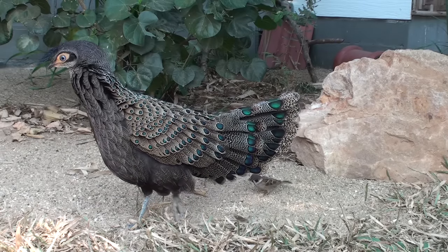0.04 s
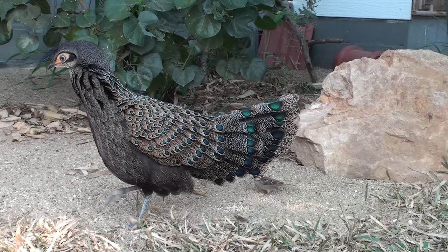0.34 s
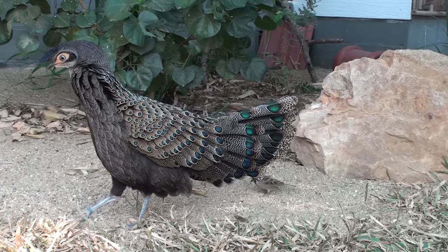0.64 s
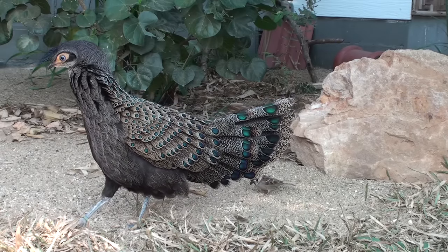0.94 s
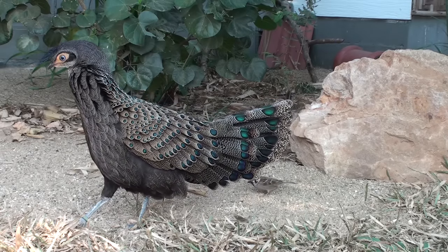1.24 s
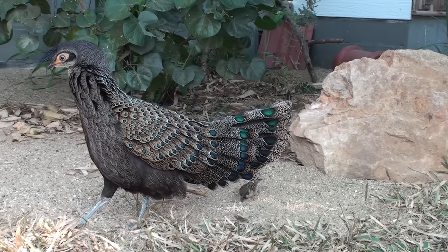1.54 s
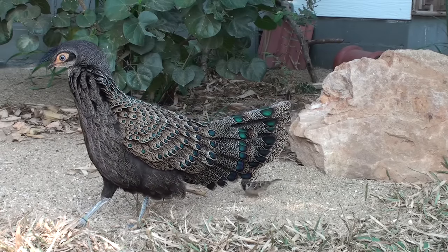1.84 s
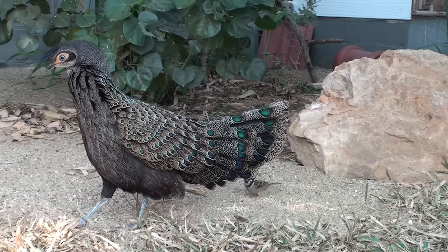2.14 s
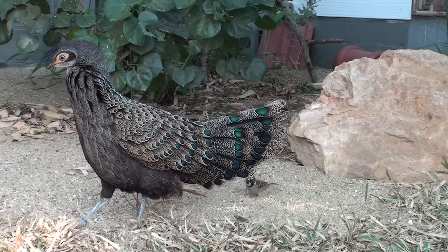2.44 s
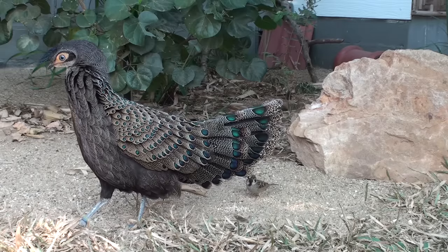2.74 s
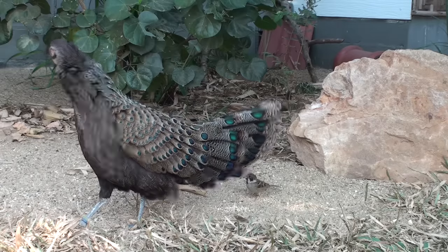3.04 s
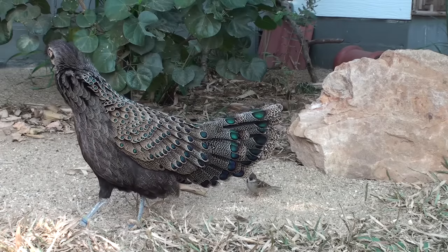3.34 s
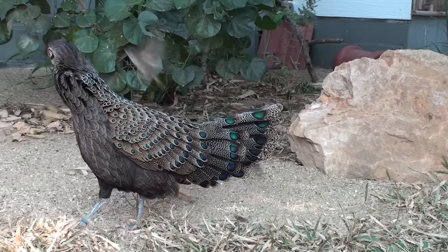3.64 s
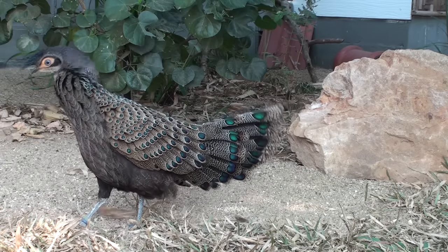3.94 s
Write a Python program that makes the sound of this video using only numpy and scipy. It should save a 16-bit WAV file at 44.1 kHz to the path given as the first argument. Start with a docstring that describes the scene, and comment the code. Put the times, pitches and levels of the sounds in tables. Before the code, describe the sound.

Four rising pheasant whistles and a sharp chip sound over faint fowl and outdoor rumble.

```python
"""Grit scuffs underfoot, then a pheasant in a sandy yard gives four rising whistles and one sharp chip:
gliding tones, thrown back to the microphone by a wall and a rock. Small birds call on the left,
roosters crow and fowl yelp in the distance, and at the end a small bird flutters off, its wings
puffing and clapping. Under it all lie a low rumble, distant traffic and a fine hiss."""
import sys
import numpy as np
from scipy import signal
from scipy.fft import rfft, irfft
from scipy.io import wavfile

SR = 44100
rng = np.random.default_rng(int(sys.argv[2]) if len(sys.argv) > 2 else 0)


def to_wav(sig):
    """Store sig (one row per channel, or 1-D mono) as 16-bit WAV at the path in sys.argv[1].

    Samples outside -1..1 are clipped; the rate is SR.
    """
    pcm = np.clip(np.atleast_2d(sig), -1, 1) * 32767
    pcm = np.round(pcm).astype(np.int16)
    wavfile.write(sys.argv[1], SR, pcm.T)  # frames by channels


N = 176400

# the pheasant's whistles: start_s, length_s, level_db, pitch_ratio, rasp_level_db
WHISTLES = [(0.352, 0.17, -36.5, 0.99, -55.5), (1.608, 0.178, -39, 1.0, -60.5),
            (2.403, 0.2, -40, 0.97, -56), (3.642, 0.2, -40, 0.98, -56)]
# the rise they share: share_of_length, base_pitch_hz, relative_db
WHISTLE_GLIDE = [(0, 3560, -22), (.13, 3930, -10), (.23, 4170, -9), (.33, 4480, -1.5), (.47, 4800, 0),
                 (.6, 5170, -1), (.71, 5290, -2), (.78, 5650, 1.5), (.84, 6250, .5), (.895, 6850, -3),
                 (.935, 7020, -6), (1, 6600, -11)]
# the sharp chip: time_s, pitch_hz, level_db
CHIP = [(.942, 3450, -56), (.949, 5330, -41), (.956, 6010, -46), (.965, 5800, -32.5), (.975, 5770, -31.5),
        (.981, 5710, -41.5), (.986, 6050, -35.5), (.993, 6900, -48), (1.003, 6600, -36)]
# near reflections at the microphone: left_delay_s, right_delay_s, left_gain, right_gain
ECHOES = [(.0052, .0052, 0.25, 0.22), (0.0118, 0.0086, 0.3, 0.062), (.022, .022, .38, 0.38),
          (.029, .028, 0.42, .18)]


def pheasant():
    """Close by, a little right: rasp-led whistles and a chip, with near echoes and two tails."""
    dry = np.zeros(N)
    for start, length, db, ratio, rasp_db in WHISTLES:
        curve = [(start + u * length, hz * ratio, db + rel_db) for u, hz, rel_db in WHISTLE_GLIDE]
        add(dry, *voice(curve, [0, -38], jitter=0.007, jitter_hz=216, shimmer_db=2.4, waver=0.008))
        add(dry, *rasp(start - 0.029, length=0.058, hz=5330, width_hz=1600, db=rasp_db, skew=0.6))
    add(dry, *voice(CHIP, [0, -36], jitter=0.0067, jitter_hz=150, shimmer_db=2.5))
    near = pan(dry, left_db=-3.5)
    for left_s, right_s, left_gain, right_gain in ECHOES:
        add(near[0], left_s, left_gain * dry)
        add(near[1], right_s, right_gain * dry)
    short_tail = yard(dry, t60_s=0.26, rise_s=0.012, left_db=2, coherence=0.9)
    long_tail = yard(dry, t60_s=1.0, rise_s=0.04, left_db=0, coherence=0.5)
    return near + amp(-7.5) * short_tail + amp(-23) * long_tail


# a small bird's falling slur: time_s, pitch_hz, level_db
SLUR = [(.574, 3900, -62), (.585, 3550, -57), (.594, 3950, -39.5), (.604, 4350, -55), (.615, 3950, -63),
        (.622, 2900, -48.5), (.63, 2120, -51.5), (.648, 2500, -55)]
# a short hoarse cluck: time_s, pitch_hz, level_db
CLUCK = [(2.25, 1540, -64), (2.257, 1590, -55), (2.264, 1902, -56), (2.272, 1590, -54.5),
         (2.285, 1580, -53)]
# hoarse notes: start_s, length_s, centre_hz, width_hz, level_db
HOARSE_NOTES = [(-.02, 0.069, 3600, 970, -61), (0.165, 0.029, 3580, 400, -61.5),
                (2.262, 0.064, 4720, 1800, -63), (3.044, 0.11, 4370, 1130, -60)]


def small_birds():
    """From the bushes left of the microphone: a slur, a cluck and hoarse notes."""
    dry = np.zeros(N)
    add(dry, *voice(SLUR, [0, -26], jitter=0.01, jitter_hz=200, shimmer_db=1))
    add(dry, *voice(CLUCK, [3, -1, -10, -14], jitter=0.037, jitter_hz=596, shimmer_db=3.5, edge_s=0.0027))
    for note in HOARSE_NOTES:
        add(dry, *rasp(*note))
    return pan(dry, left_db=4) + amp(-6) * yard(dry, t60_s=0.2, rise_s=0.006, left_db=4)


# a small bird's wingbeats: start_s, level_db
WINGBEATS = [(3.575, -50.5), (3.664, -50), (3.702, -49.5), (3.743, -52.5), (3.792, -50.5), (3.824, -50),
             (3.857, -49.5), (3.899, -50.5), (3.94, -51)]
# spectrum of a puff of air: frequency_hz, relative_db
PUFF_SPECTRUM = [(40, -9), (130, 5), (300, -2.5), (600, -5.5), (1200, -14.5), (3000, -16.5), (8000, -29),
                 (16000, -45)]
# claps of the first downstrokes: start_s, level_db
WING_CLAPS = [(3.663, -41), (3.703, -48)]
# spectrum of a clap's snap: frequency_hz, relative_db
SNAP_SPECTRUM = [(200, -23), (900, -17), (3000, 8), (4500, -15), (12000, -23)]


def wings(puff_rise_s=0.0029, clap_hz=585, clap_rise_s=0.0013, clap_decay_s=0.0033):
    """Take-off just left of centre: each beat puffs air, and the first hard strokes also clap."""
    t = np.arange(4000) / SR
    puffs, snaps = np.zeros((2, N))
    for start, db in WINGBEATS:
        add(puffs, start, amp(db) * t / puff_rise_s * np.exp(1 - t / puff_rise_s))
    dry = colour(puffs * rng.standard_normal(N), PUFF_SPECTRUM)
    for start, db in WING_CLAPS:
        envelope = amp(db) * np.minimum(t / clap_rise_s, 1) * np.exp(-t / clap_decay_s)
        add(dry, start, envelope * np.sin(2 * np.pi * clap_hz * t))
        add(snaps, start, envelope * rng.standard_normal(len(t)))
    dry += amp(-9.5) * colour(snaps, SNAP_SPECTRUM)
    return pan(dry, left_db=2.5) + amp(-2) * yard(dry, t60_s=0.4, rise_s=0.01, left_db=2.5)


# scuffs on sand: start_s, length_s, level_db
SCUFFS = [(0.003, 0.42, -64.5), (1.598, 0.15, -68), (2.488, 0.26, -66.5), (3.61, 0.11, -63),
          (3.697, 0.38, -63)]
# spectrum of shifting sand: frequency_hz, relative_db
SAND_SPECTRUM = [(1000, 2), (4000, 1), (9000, 1), (13000, 0.5), (18000, -14.5)]
# ticks of larger grains: start_s, level_db
TICKS = [(.082, -52), (.09, -52.5), (.162, -55), (0.222, -53), (.266, -54), (1.672, -55), (2.63, -59),
         (3.479, -60), (3.792, -57), (3.931, -53)]
# spectrum of a tick: frequency_hz, relative_db
TICK_SPECTRUM = [(1000, -8), (9000, 6), (13500, -1), (18000, -13)]


def grit(grains_per_s=2500, tick_decay_s=0.0035):
    """Straight ahead of the microphone, feet shift sand grains; a few larger ones tick."""
    scuffing, ticks = np.zeros((2, N))
    for start, length, db in SCUFFS:
        progress = np.arange(0, length, 1 / SR) / length
        add(scuffing, start, amp(db) * np.sqrt(abs(np.sin(np.pi * progress))))
    grains = rng.standard_normal(N) * (rng.random(N) < grains_per_s / SR)
    t = np.arange(2000) / SR
    for start, db in TICKS:
        add(ticks, start, amp(db) * np.exp(-t / tick_decay_s) * rng.standard_normal(len(t)))
    return colour(scuffing * unit(grains), SAND_SPECTRUM) + colour(ticks, TICK_SPECTRUM)


# a distant rooster: time_s, pitch_hz, level_db
HIGH_CROW = [(.72, 975, -72), (.79, 1003, -57.5), (.93, 986.4, -73), (1.02, 1030, -59), (1.2, 997, -56),
             (1.37, 1004, -58), (1.52, 1019, -76), (1.65, 1000, -59), (1.76, 1000, -66), (1.82, 983, -77)]
# a second, lower rooster: time_s, pitch_hz, level_db
LOW_CROW = [(.49, 784, -83), (.53, 801, -56), (.62, 820, -82), (.78, 971, -66.5), (1.1, 926, -66),
            (1.4, 898, -72), (1.6, 881, -78), (1.78, 863, -61.5), (1.88, 844, -71)]
# falling yelps: start_s, pitch_hz, level_db, fall_share, jitter_share, fourth_harmonic_db
YELPS = [(1.885, 760.5, -57.5, 0.059, 0.037, -14), (2.135, 794, -58.5, 0.082, 0.0277, -9),
         (2.385, 750.4, -60, 0.038, 0.016, -20), (2.65, 757.5, -63, 0.047, .012, -15),
         (2.97, 755, -62.5, 0.045, 0.011, -11)]


def far_fowl(yelp_s=0.12):
    """Far off to the left: two crows overlap, then fowl yelp, all blurred by reverberation."""
    dry = np.zeros(N)
    add(dry, *voice(HIGH_CROW, [-11, 4, -15, -9], jitter=0.014, jitter_hz=110,
                    shimmer_db=2, edge_s=0.047))
    add(dry, *voice(LOW_CROW, [-1, 1.5, -1.5, -16], jitter=0.0251, jitter_hz=110,
                    shimmer_db=2.5, edge_s=0.016))
    for start, hz, db, fall, jitter, fourth_db in YELPS:
        curve = [(start, hz * (1 + fall), db - 2),
                 (start + 0.291 * yelp_s, hz, db),
                 (start + yelp_s, hz * (1 - fall), db - 5)]
        add(dry, *voice(curve, [-6, -36, 3, fourth_db], jitter, jitter_hz=152.2,
                        shimmer_db=3, edge_s=0.013))
    return amp(-2.5) * (pan(dry, left_db=8.5) + yard(dry, t60_s=0.46, rise_s=0.011, left_db=3.5))


# spectrum of the yard's rumble and hiss: frequency_hz, relative_db
AIR_SPECTRUM = [(12, -55), (25, -14.5), (45, -3.5), (70, -1), (92, -1.5), (120, 0), (152, -5.5),
                (184, -14.5), (320, -19.5), (500, -17), (680, -12), (900, -19), (1110, -17), (1550, -20.5),
                (2150, -22), (2950, -28.5), (3400, -26.5), (4600, -27), (5900, -30.5), (7450, -17.5),
                (8600, -24.5), (9300, -25), (9950, -29.5), (10450, -28.5), (11500, -34.5), (18000, -42.5)]
# how alike the two channels are: frequency_hz, coherence
AIR_COHERENCE = [(60, 0.96), (110, 1), (200, 0.78), (380, 0.029), (700, 0.4), (1290, 0.05), (2400, 0.12),
                 (4400, 0.61), (8400, 0.6), (10000, 0.97)]
# balance at the microphone: frequency_hz, left_minus_right_db
AIR_BALANCE = [(60, 0), (150, 1), (380, 0.5), (950, 2.5), (2380, -1), (5980, -0.5), (15000, -0.5)]
# slow swell of the rumble: time_s, gain_db
RUMBLE_SWELL = [(0, 6.5), (.4, 2), (1.4, 1.3), (2, 0.5), (2.7, 3), (4, 4)]


def rumble_and_hiss(rumble_below_hz=230):
    """All around the microphone: steady hiss over a low rumble that eases and swells again."""
    hz = np.fft.rfftfreq(N, 1 / SR)
    left, independent = rfft(rng.standard_normal((2, N)))
    right = blend(left, independent, np.clip(read(AIR_COHERENCE, hz), -1, 1))
    left_db = read(AIR_BALANCE, hz)
    spectra = np.array([left * amp(left_db / 2), right * amp(-left_db / 2)])
    air = amp(-55.5) * unit(irfft(spectra * amp(read(AIR_SPECTRUM, hz)), N))
    rumble = irfft(rfft(air) / (1 + (hz / rumble_below_hz) ** 4), N)
    return air + rumble * (amp(follow(RUMBLE_SWELL)) - 1)


# spectrum of the distant road: frequency_hz, relative_db
TRAFFIC_SPECTRUM = [(200, -9), (450, -16.5), (650, -1.5), (850, -8.5), (1300, -13.5), (2500, -11.5),
                    (5000, -21.5), (10000, -71)]
# its rise and fall: time_s, level_db
TRAFFIC_SWELL = [(0, -62), (.4, -74), (.9, -56), (1.4, -61), (1.8, -58.5), (2.2, -76), (2.6, -71), (4, -65)]


def traffic():
    """A distant road, diffuse and leaning left: noise that swells and fades unevenly."""
    direct = pan(rng.standard_normal(N), left_db=9.5)
    diffuse = 1.96 * rng.standard_normal((2, N))
    road = unit(colour(direct + diffuse, TRAFFIC_SPECTRUM))
    return road * amp(follow(TRAFFIC_SWELL) + 4.5 * band(N, 0, 3.6))


def voice(curve, harmonics_db, jitter, jitter_hz, shimmer_db, edge_s=0.0024, waver=0.00712, waver_hz=40):
    """A bird's unsteady tone along rows of time_s, pitch_hz, level_db; returns start and sound."""
    times, hz, db = np.transpose(curve)
    t = np.arange(times[0], times[-1], 1 / SR)
    wobble = jitter * band(len(t), 0, jitter_hz) + waver * band(len(t), 0, waver_hz)
    pitch = np.interp(t, times, hz) * (1 + wobble)
    phase = 2 * np.pi * np.cumsum(pitch) / SR
    level = amp(np.interp(t, times, db) + shimmer_db * band(len(t), 0, jitter_hz))
    edges = np.clip(np.minimum(t - times[0], times[-1] - t) / edge_s, 0, 1)
    tone = sum(amp(gain_db) * np.sin(k * phase) for k, gain_db in enumerate(harmonics_db, 1))
    return times[0], edges * level * tone


def rasp(start, length, hz, width_hz, db, skew=0.74, grain_db=4.5):
    """A hoarse, grainy note with a quick swell and slower fade; returns start and sound."""
    progress = np.arange(0, length, 1 / SR) / length
    swell = np.sin(np.pi * progress ** skew) ** 2
    level = amp(db + grain_db * band(len(swell), 0, 120))
    return start, swell * level * band(len(swell), hz, width_hz)


def yard(x, t60_s, rise_s, left_db, coherence=1.0):
    """The yard's scattered reflections reach the microphone as a diffuse tail."""
    t = np.arange(SR) / SR
    envelope = (1 - np.exp(-t / rise_s)) * amp(-60 * t / t60_s)
    left, independent = rng.standard_normal((2, SR)) * envelope
    tails = np.array([left, blend(left, independent, coherence)]) / np.linalg.norm(left)
    return signal.fftconvolve(x[None], tails, axes=1)[:, :N] * amp([[left_db / 2], [-left_db / 2]])


def amp(db):
    """Decibels to gain."""
    return 10 ** (np.asarray(db) / 20)


def unit(x):
    """Scales to rms 1."""
    return x / np.sqrt(np.mean(x ** 2) + 1e-20)


def read(points, hz):
    """Reads a table on a log-frequency axis."""
    frequencies, values = np.transpose(points)
    return np.interp(np.log(hz + 1), np.log(frequencies + 1), values)


def follow(points):
    """Reads a table along the scene's time."""
    return np.interp(np.arange(N) / SR, *np.transpose(points))


def add(track, start_s, sound):
    """Adds a sound to a track, cut to fit."""
    at = round(start_s * SR)
    sound = sound[max(-at, 0):]
    part = track[max(at, 0):][:len(sound)]
    part += sound[:len(part)]


def colour(x, points):
    """Gives a signal a spectrum, keeping the power of white noise."""
    gain = unit(amp(read(points, np.fft.rfftfreq(N, 1 / SR))))
    return irfft(rfft(x) * gain, N)


def band(size, hz, width_hz):
    """Noise in a bell-shaped band; at 0 Hz, a random wobble."""
    bell = np.exp(-((np.fft.rfftfreq(N, 1 / SR) - hz) / width_hz) ** 2)
    return unit(irfft(rfft(rng.standard_normal(N)) * bell, N))[:size]


def blend(noise, independent, coherence):
    """Mixes two noises at constant power; coherence 1 gives only the first."""
    return coherence * noise + np.sqrt(1 - coherence ** 2) * independent


def pan(x, left_db):
    """Places a sound between the channels."""
    return np.array([x * amp(left_db / 2), x * amp(-left_db / 2)])


def scene():
    """The whole yard from one stereo microphone."""
    return pheasant() + small_birds() + wings() + grit() + far_fowl() + rumble_and_hiss() + traffic()


def record(dry):
    """The recorder's band limit."""
    lowpass = signal.firwin(511, cutoff=18150, window=("kaiser", 9), fs=SR)
    return signal.oaconvolve(dry, lowpass[None], "same")


dry = scene()
out = record(dry)
to_wav(out)
```